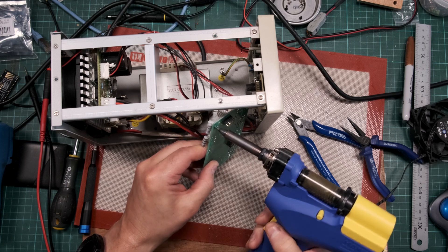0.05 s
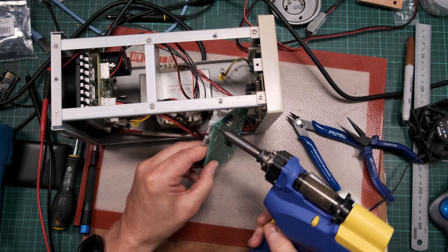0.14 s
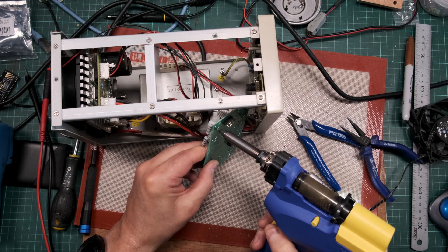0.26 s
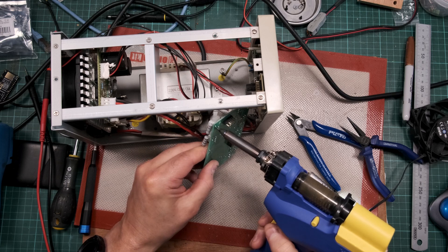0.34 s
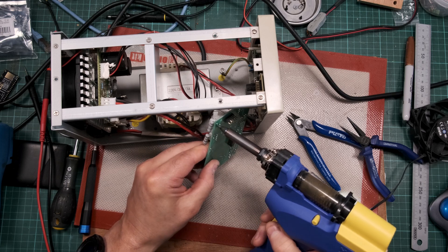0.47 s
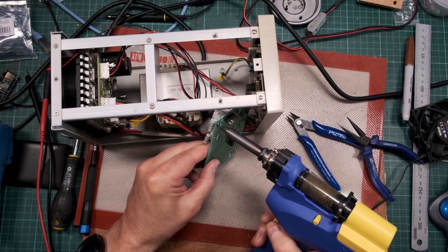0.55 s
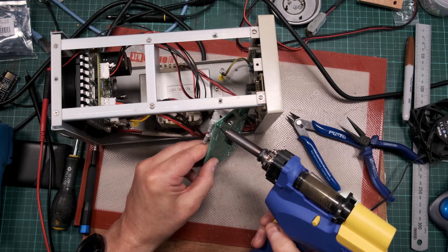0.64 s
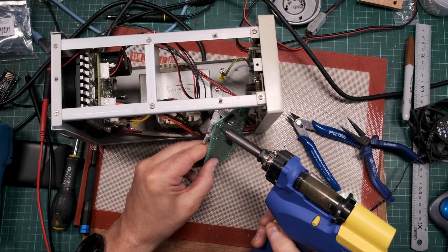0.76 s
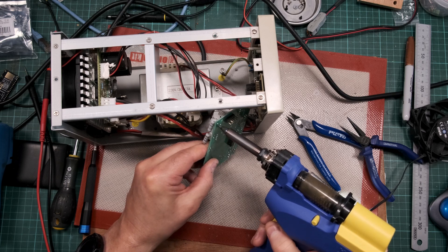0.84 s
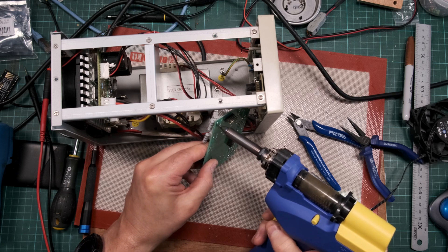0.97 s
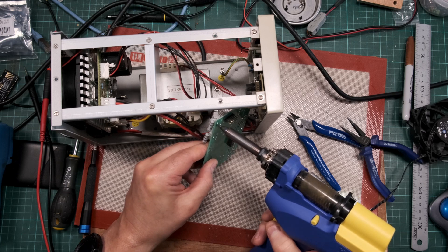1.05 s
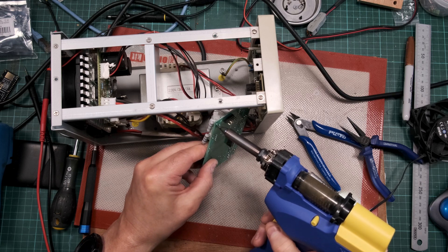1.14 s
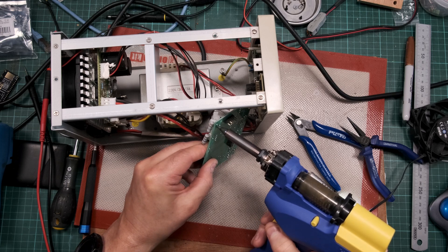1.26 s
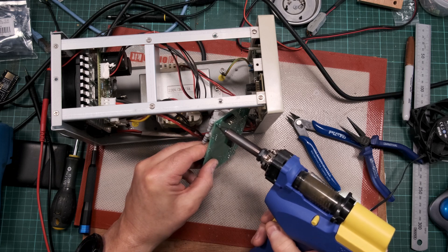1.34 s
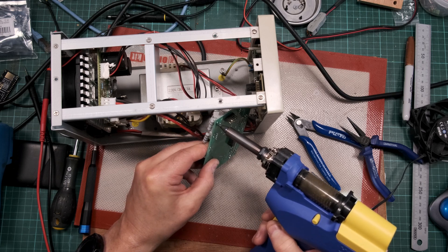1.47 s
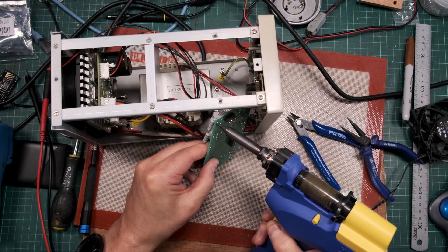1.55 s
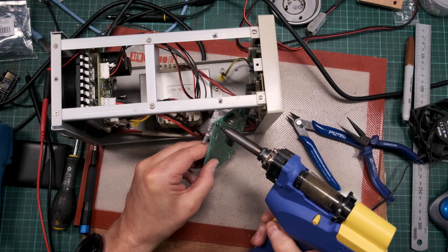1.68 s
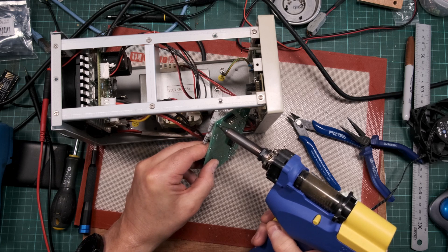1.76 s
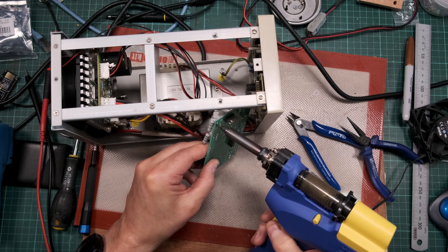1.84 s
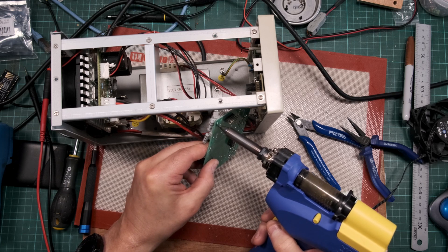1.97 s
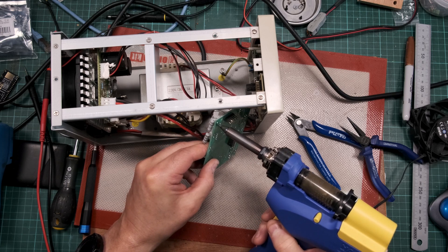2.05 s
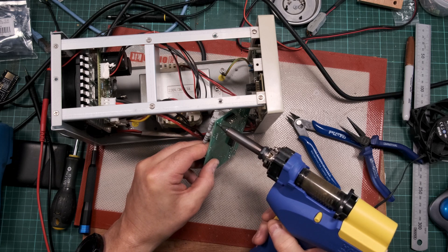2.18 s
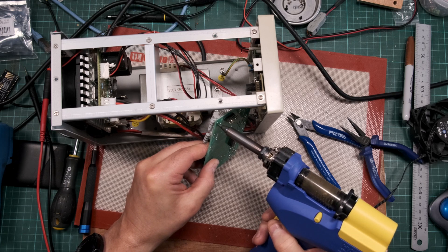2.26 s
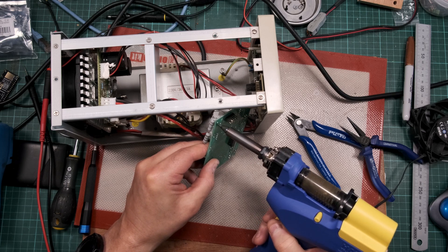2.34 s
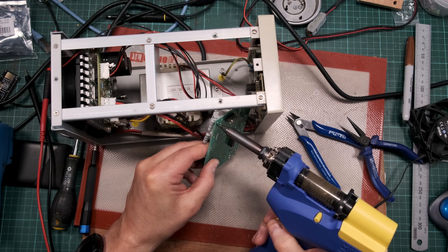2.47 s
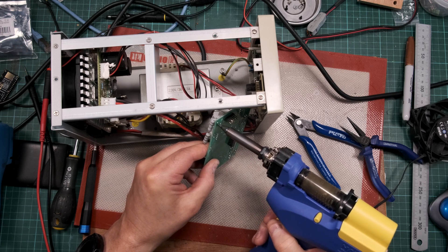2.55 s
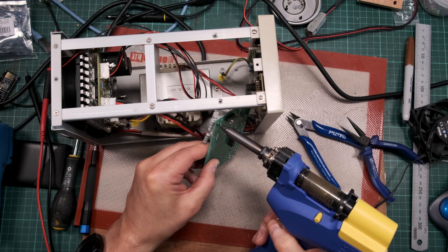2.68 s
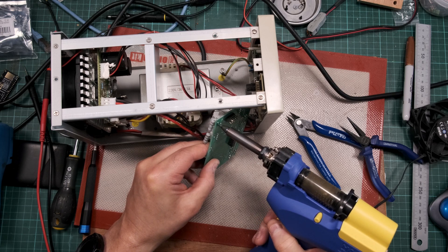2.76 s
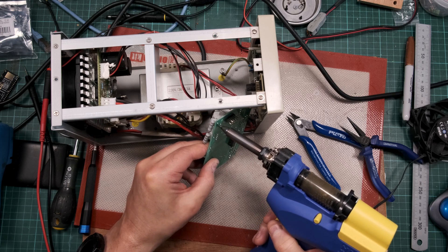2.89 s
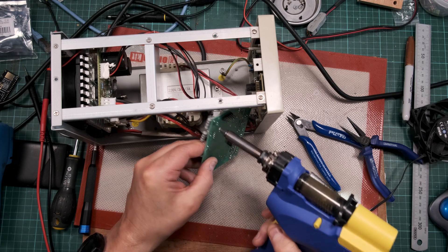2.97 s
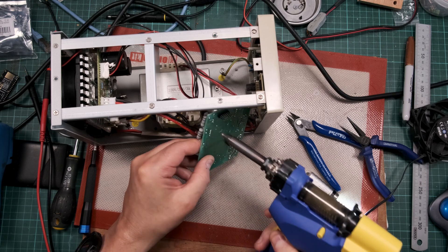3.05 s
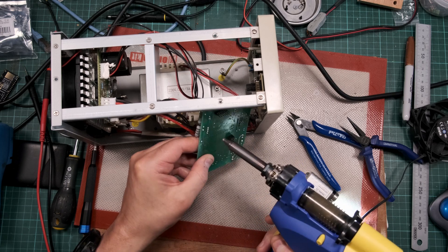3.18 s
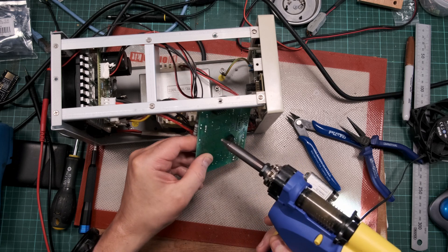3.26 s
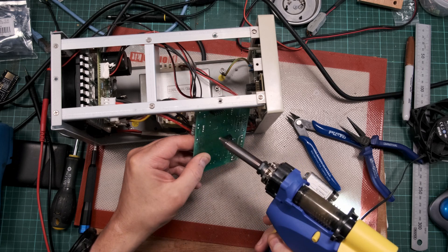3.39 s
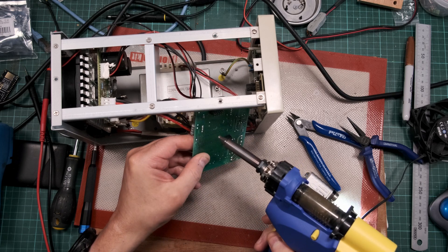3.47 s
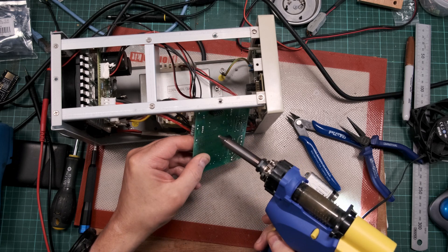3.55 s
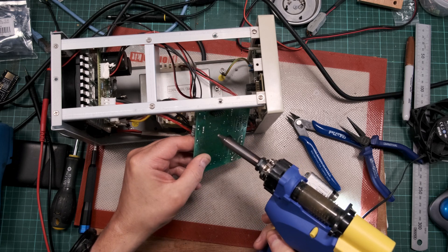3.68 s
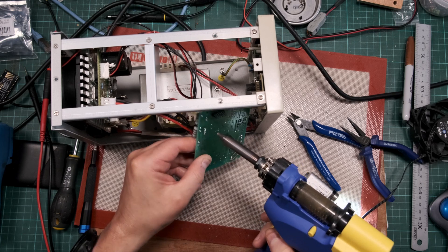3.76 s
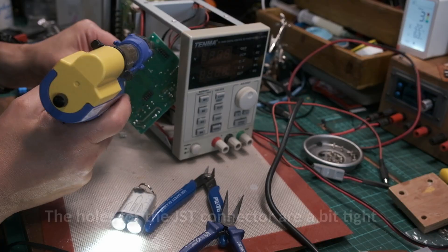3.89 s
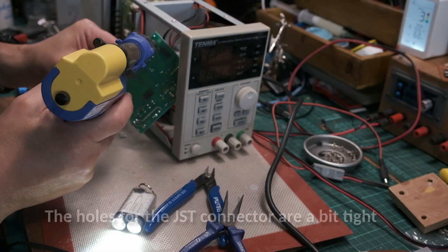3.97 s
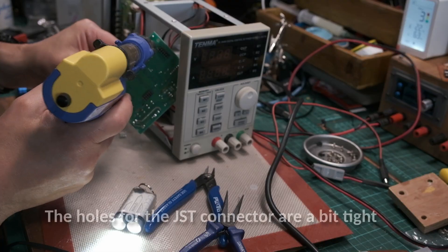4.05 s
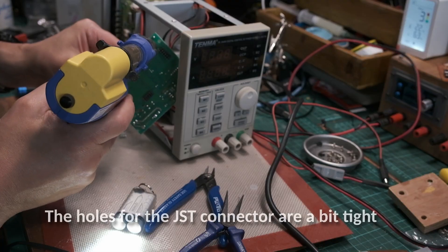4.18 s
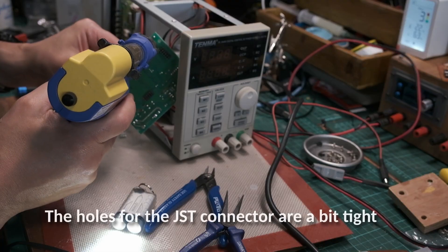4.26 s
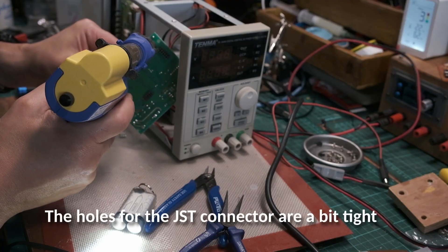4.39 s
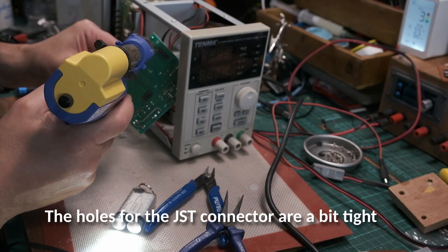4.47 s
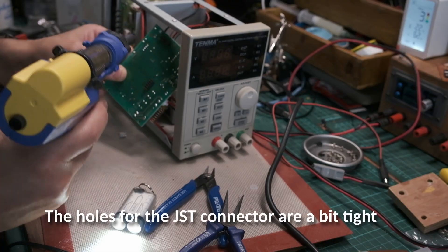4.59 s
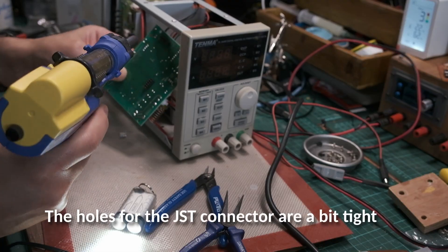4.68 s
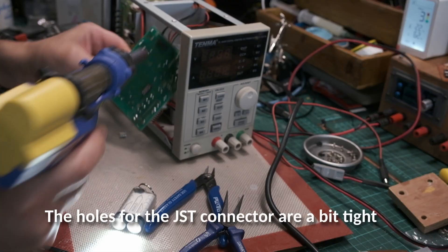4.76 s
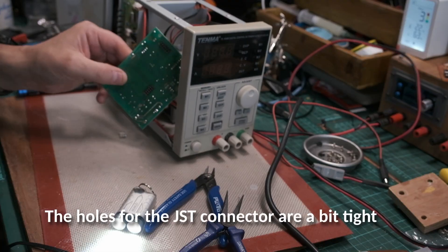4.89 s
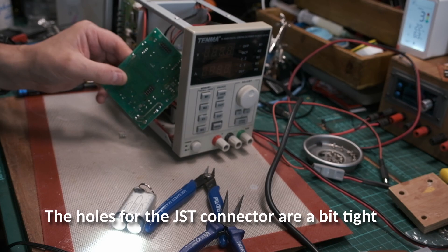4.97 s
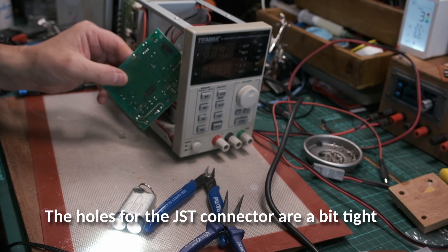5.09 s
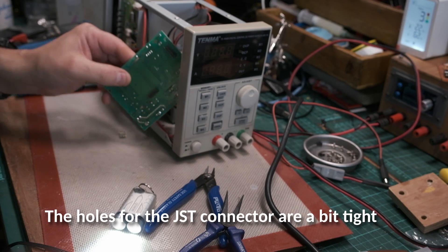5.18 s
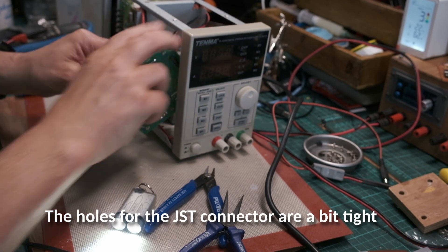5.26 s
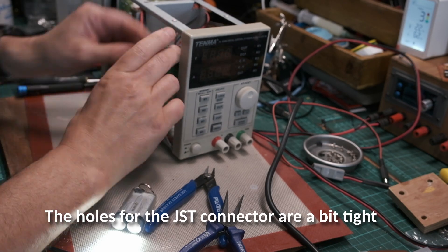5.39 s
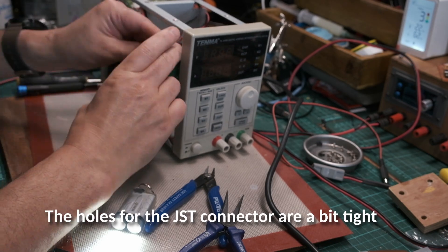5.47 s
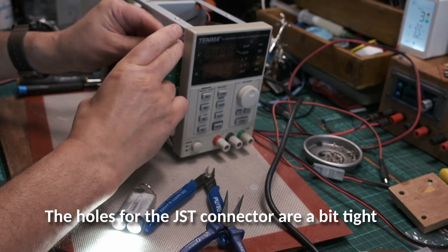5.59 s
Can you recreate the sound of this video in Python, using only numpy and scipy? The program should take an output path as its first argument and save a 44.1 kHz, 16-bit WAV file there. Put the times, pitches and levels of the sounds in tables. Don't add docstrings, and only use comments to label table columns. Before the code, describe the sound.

Over a quiet fan hum, a handheld desoldering gun buzzes twice in harsh rattling bursts, then is set down with a clack amid rustling.

```python
import sys
import numpy as np
from scipy import signal
from scipy.fft import rfft, irfft
from scipy.io import wavfile

SR = 44100
rng = np.random.default_rng(int(sys.argv[2]) if len(sys.argv) > 2 else 0)


def dump(signal):
    limited = np.clip(np.atleast_2d(signal).T, -1, 1)
    pcm = np.round(limited * 32767).astype(np.int16)
    wavfile.write(sys.argv[1], SR, pcm)


def makeup_ratio(level_db):
    decades = np.asarray(level_db, float) / 20
    return 10 ** decades


N = 248265

FULL_SPEED = 95
DROP_S, RETURN_S, BACK_S = 3.838, 3.852, 3.862
# start in seconds, release in seconds, then stroke level, rattle level
# and diaphragm level at full speed, all in dB.
PUMP_RUNS = [
    (2.336, 2.82, -27.5, -38.5, -35.5),
    (4.291, 4.53, -28, -39, -34.5),
]


def evened(x):
    return x / np.sqrt(np.mean(x ** 2) + 1e-20)


def curves(rows):
    s, *columns = np.transpose(rows)
    t = np.arange(s[0], s[-1], 1 / SR)
    return s[0], [np.interp(t, s, c) for c in columns]


def add(mix, s, sound):
    part = mix[round(s * SR):][:len(sound)]
    part += sound[:len(part)]


def coloured(count, points):
    hz = np.fft.rfftfreq(count, 1 / SR)
    f, db = np.transpose(points)
    gain = makeup_ratio(np.interp(np.log(hz + 1), np.log(f), db))
    return evened(irfft(rfft(rng.standard_normal(count)) * gain, count))


def resonate(x, hz, width):
    turn = np.exp(2j * np.pi * hz * np.arange(len(x)) / SR)
    r = np.exp(-np.pi * width / SR)
    return 2 * (turn * signal.lfilter([1 - r], [1, -r], x / turn)).real


def ring(modes, count=4000, shorter=1.):
    t = np.arange(count) / SR
    x = np.zeros(count)
    for k, (hz, db, t60) in enumerate(modes):
        x += (-1) ** k * makeup_ratio(db - 60 * t / t60 / shorter) * np.sin(2 * np.pi * hz * t)
    return x / np.linalg.norm(x)


def struck(peaks, shorter):
    hz = abs(np.fft.fftfreq(8192, 1 / SR))
    power = sum(makeup_ratio(2 * db) / (1 + (2 * shorter * (hz - f) / w) ** 2) ** 2 for f, w, db in peaks)
    gain = np.log(power + 1e-9) / 2
    return np.fft.ifft(np.exp(gain - 1j * signal.hilbert(gain).imag)).real[:4096]


def strikes(turns, size, count):
    at = np.flatnonzero(np.diff(np.floor(turns)) > 0)
    late = (np.ceil(turns[at]) - turns[at]) / (turns[at + 1] - turns[at])
    size = size[at] * makeup_ratio(0.21 * rng.standard_normal(len(at)))
    out = np.zeros(count)
    out[at], out[at + 1] = size * (1 - late), size * late
    return out


def drift(rate):
    t = np.arange(0, N, 256) / SR
    rates = np.geomspace(rate / 16, rate, num=16)
    slow = sum(np.sin(2 * np.pi * (f * t + rng.random())) / np.sqrt(f) for f in rates)
    return np.interp(np.arange(N) / SR, t, evened(slow))


def runs():
    # time in seconds, speed in turns per second.
    shaft = [(2.33, 36.51), (2.37, 72.7), (2.426, 85.37), (2.571, 93.58), (2.69, 93.81), (2.773, 96.08),
             (2.818, 92.41), (2.891, 28.31), (2.935, 33.72)]
    first_turn, stroke_lag_s = -.34, .0008
    vacuum_s = .25
    late_start, late_end, late_coast_per_s = 1.35, .92, 5.38
    (s, release, *_), (s2, release2, *_) = PUMP_RUNS
    s0, (speed,) = curves(shaft)
    part = slice(round((s - s0) * SR), None)
    turns, speed = (first_turn + np.cumsum(speed) / SR)[part], speed[part]
    t = s + np.arange(len(turns)) / SR
    late = late_end + (late_start - late_end) * np.exp(-((t - s) / vacuum_s) ** 3)
    late = late + late_coast_per_s * np.clip(t - release - .04, 0, .1)
    first = pump(turns, late, speed, *effort(0, t, speed), [1.], 0.94)

    burst = rfft(rng.standard_normal(2049) * np.exp(-(np.arange(-1024, 1025) / (0.0069 * SR)) ** 2))
    blur = irfft(burst / abs(burst), 2049)
    low, top, spin_up_s = 72, 94.8, .032
    fade_db_per_s = 1250
    t = np.arange(s2, release2 + .05, 1 / SR)
    speed = top - (top - low) * np.exp(-(t - s2) / spin_up_s)
    second = pump(np.cumsum(speed) / SR - .2, 0.9, speed, *effort(1, t, speed), blur, 0.72)
    fade = makeup_ratio(-fade_db_per_s * np.maximum(s2 + np.arange(len(second)) / SR - release2, 0))
    return [(s + stroke_lag_s, first), (s2, second * fade)]


def effort(k, t, speed):
    pace = (1, 2.5)[k]
    weak_start_db, rise_s = (-8, -14)[k], 0.017
    kick_db, stroke_kick_db, kick_s = 6, 6.5, .04
    build_db, build_s = 6, 0.084
    hum_build_db, hum_build_s, hum_db_per_decade = 8, 0.14, 61
    coast_db_per_s, rattle_coast_db_per_s = 214, 133
    start, release, stroke_db, rattle_db, low_db = PUMP_RUNS[k]
    rise = weak_start_db * np.clip(1 - (t - start) / rise_s, 0, 1)
    coast = np.maximum(t - release, 0)
    age = (t - start) * pace
    jolt = np.exp(-age / kick_s)
    stroke = stroke_db + rise + stroke_kick_db * jolt - build_db * np.exp(-age / build_s)
    stroke = stroke - coast_db_per_s * coast
    rattle = rattle_db + kick_db / pace * jolt + k * rise - rattle_coast_db_per_s * coast
    hum = low_db + hum_db_per_decade * np.log10(speed / FULL_SPEED)
    return stroke, rattle, hum - hum_build_db * np.exp(-age / hum_build_s)


def pump(turns, late, speed, stroke_db, rattle_db, low_db, blur, shorter):
    # frequency in Hz, width in Hz, level in dB.
    grip_mode, shell_modes, barrel_modes = [(249, 190, -16)], [(400, 58, -10), (461, 141, -23), (538, 112, -11),
                                                          (652, 96, -16), (775, 46, -14.5), (906, 61, -5.5),
                                                          (1033, 105, -3.5), (1181, 261, -19),
                                                          (1281, 122, -16), (1580, 300, -21)], [(1830, 111, -13), (1950, 57, -9),
                                                                         (2070, 189, -14), (2260, 73, -16),
                                                                         (2400, 166, -25), (2540, 170, -25),
                                                                         (2790, 300, -27), (3150, 148, -31),
                                                                         (3340, 49, -32), (3540, 226, -25),
                                                                         (3770, 71, -36), (4040, 262, -34),
                                                                         (4530, 300, -36), (4750, 233, -37)]
    # frequency in Hz, level in dB, t60 in seconds.
    flap_modes = [(5000, -7, .008), (5920, 1, 0.021), (6530, 9, 0.0061), (7710, 4.5, 0.0069),
                  (8100, 5.5, 0.0091), (8700, 10.5, 0.0034), (9900, -16.5, 0.011), (11100, -11.5, 0.0092),
                  (12500, -22.5, 0.007), (13920, -47, .006)]
    # share of the turn, level in dB.
    flap_blows = [(0, -5), (.09, -15.5), (0.239, -3.5), (.44, -19.5), (.66, -30.5)]
    # harmonic of the shaft, level in dB.
    harmonics = [(1, -8.5), (2, -8), (3, -4.5)]
    # frequency in Hz, density in dB per Hz.
    air_spectrum = [(2500, -14), (4000, -10.5), (5500, -6), (6350, -9), (7350, -7.5), (8460, -9),
                    (9600, -6.5), (10300, -20), (10900, -8.5), (14800, -24), (16000, -30)]
    rebound_share, full_bounce = 0.2047, 91
    shut_share, inlet_share, inlet_db = .12, .46, -8.5
    settle_s = .007

    count = len(turns) + 4000
    slow = np.sqrt(SR / speed)
    missing = FULL_SPEED - speed
    slack = np.clip(missing / 25, 0, 1)
    shell, barrel = struck(grip_mode + shell_modes, shorter), struck(barrel_modes, shorter)
    size = slow * makeup_ratio(stroke_db) / np.hypot(np.linalg.norm(shell), np.linalg.norm(barrel))

    bounce = size * np.clip(missing / full_bounce, 0, .9)
    valve = strikes(turns, size, count) + strikes(turns - rebound_share * late, bounce, count)
    blows = signal.fftconvolve(valve, shell)[:count]
    shut = strikes(turns - shut_share * late, size, count)
    blows = blows + signal.fftconvolve(shut, barrel)[:count]
    inlet = makeup_ratio(inlet_db) * strikes(turns - inlet_share, size, count)
    blows = blows + signal.fftconvolve(inlet, np.diff(barrel, 2) * 8.0)[:count]

    taps = rng.standard_normal(len(turns)) * (rng.random(len(turns)) < .01)
    shaking = taps * 10 * np.exp(.6 - turns % 1 / speed / settle_s)
    shaking = shaking * size / slow * makeup_ratio(-15.5 + 16.5 * slack)
    add(blows, 0, signal.fftconvolve(shaking, np.diff(barrel) * 3.7 + 0.67 * shell[1:]))

    flaps = np.zeros(count)
    for share, db in flap_blows:
        at = np.flatnonzero(np.diff(np.floor(turns - share * late)) > 0)
        chance = rng.standard_normal((len(at), 2))
        delay = abs((.6 + 2.5 * slack[at]) * chance[:, 0]).astype(int)
        uneven_db = (1.2 + 4 * slack[at]) * chance[:, 1]
        flaps[at + delay] += slow[at] * makeup_ratio(rattle_db[at] + db + uneven_db)
    flap_ring = ring(flap_modes, shorter=shorter)
    blows = blows + makeup_ratio(-3.5) * signal.fftconvolve(flaps, flap_ring)[:count]

    hum = -np.sqrt(2) * sum(makeup_ratio(db) * np.cos(2 * np.pi * k * (turns - .08)) for k, db in harmonics)
    puff = 0.5 + np.exp(-(turns % 1) / 0.52)
    air = makeup_ratio(rattle_db - 9.5 + 2.86 * slack) * puff * coloured(len(turns), air_spectrum)
    add(blows, 0, makeup_ratio(low_db) * hum + air)
    return signal.fftconvolve(blows, blur, "same")


def bleed(s, stop, hold_db):
    last_puff_db, last_puff_s = 4, .008
    left = stop - np.arange(s, stop + .015, 1 / SR)
    db = hold_db + last_puff_db * np.exp(-(left / last_puff_s) ** 2) + 1200 * np.minimum(left, 0)
    bands = [(2000, -14), (5000, -0.5), (6300, -1.5), (7000, -7), (7700, -1), (8600, -6), (9500, -9),
             (10300, -9), (11000, -7), (11700, -11), (12400, -4), (13300, -11), (14800, -2), (16000, -10)]
    return s, makeup_ratio(db) * coloured(len(db), bands)


def trigger(s, db, hz, t60):
    t = np.arange(1500) / SR
    spectrum = [(500, 2.0), (2000, -13.5), (8000, 0.0), (12000, -4), (16000, -17)]
    snap = coloured(1500, spectrum) * makeup_ratio(-60 * t / 0.009)
    tone = makeup_ratio(-60 * t / t60) * np.sin(2 * np.pi * hz * t) * np.minimum(t / 0.0016, 1)
    return s, makeup_ratio(db) * (.5 * snap + .6 * tone)


def landing(s, db):
    # frequency in Hz, level in dB, t60 in seconds.
    tool_modes = [(784, -16, 0.074), (2483, -3.5, 0.05), (2875, -1.5, 0.16), (3300, -10, .07),
                  (4110, -8.5, 0.074), (4700, -7, 0.04), (6240, -1, 0.014), (8000, -14, 0.039),
                  (9440, -25, 0.11)]
    scuff_s, gripped_s = .0025, .045
    t = np.arange(4000) / SR
    scuff = rng.standard_normal(600) * np.exp(-t[:600] / scuff_s)
    x = signal.fftconvolve(ring(tool_modes), scuff)[:4000] * makeup_ratio(-900 * np.maximum(t - gripped_s, 0))
    return s, makeup_ratio(db - 5) * x / abs(x).max()


def laying(s, length, peak, top_db, edge_db):
    # frequency in Hz, width in Hz, level in dB.
    bench_modes, body_modes = [(473, 114, 3.5), (609, 73, -1), (815, 250, 2), (1080, 570, 3),
                               (1450, 1040, 3)], [(2350, 430, -19), (2880, 105, 14.5), (3680, 1050, 15.5),
                                              (4900, 1500, 14.5), (6650, 890, 5), (8000, 580, -25),
                                              (10100, 1000, -5)]
    bass_db = -14.5
    u = np.arange(0, length, 1 / SR) / length
    skewed = u ** (np.log(.5) / np.log(np.clip(peak, .05, .9)))
    press_db = 38 * np.log10(np.sin(np.pi * skewed) + 1e-4)
    clumps = np.minimum(rng.exponential(1, len(u)), 3)
    grains = rng.standard_normal(len(u)) * makeup_ratio(3.0 * clumps)

    def excited(modes):
        return evened(sum(makeup_ratio(db) * evened(resonate(resonate(grains, hz, w), hz, 2 * w))
                          for hz, w, db in modes))

    soft = signal.butter(2, min(2700 / peak, 16000), fs=SR, output="sos")
    tool = signal.sosfilt(soft, excited(body_modes))
    bass = evened(resonate(resonate(grains, 280, 130), 304, 190))
    body = makeup_ratio(top_db + press_db) * excited(bench_modes)
    return s, body + makeup_ratio(edge_db + press_db) * tool + makeup_ratio(top_db + bass_db + press_db) * bass


def tick(s, db, hz, top_db):
    # frequency in Hz, t60 in seconds.
    board_modes = [(2110, 0.036), (2740, 0.051), (3600, 0.028), (4500, 0.0085), (5700, 0.0063),
                   (7200, 0.0068)]
    modes = [(f * rng.uniform(0.91, 1.03), -5.0 * abs(np.log2(f / hz)), t60) for f, t60 in board_modes]
    body = np.convolve(ring(modes + [(hz, 0, .015)], count=1500), [1, 0, -1])
    snap = np.diff(rng.standard_normal(len(body) + 2), 2)
    snap = snap * makeup_ratio(-60 * np.arange(len(body)) / SR / 0.027)
    return s, makeup_ratio(db) * (body / abs(body).max() + 0.33 * makeup_ratio(top_db) * snap)


def thud(s, db, hz):
    t = np.arange(3000) / SR
    return s, makeup_ratio(db - 60 * t / 0.052) * np.sin(2 * np.pi * hz * t) * np.minimum(t / 0.00475, 1)


def rustle(peak, rise, fall, mid_db, top_db):
    s = max(peak - rise, 0)
    t = np.arange(s - peak, 1.5 * fall, 1 / SR)
    stroke_db = -20 * np.maximum(-t / rise, t / fall)
    mid = coloured(len(t), [(500, -4.0), (2000, -0.5), (5000, 1.0), (9000, -16.5), (16000, -44)])
    top = coloured(len(t), [(5000, -18), (8000, -10), (13000, -14), (16000, -15)])
    return s, makeup_ratio(mid_db + stroke_db) * mid + makeup_ratio(top_db + stroke_db) * top


def echo(x, t60):
    t = np.arange(12000) / SR
    tail = coloured(12000, [(100, -3), (1000, 0), (4000, -8), (16000, -22)])
    tail = tail * makeup_ratio(-60 * t / t60) * (t > .004)
    return makeup_ratio(-17) * signal.fftconvolve(x, tail / np.linalg.norm(tail))[:N]


def room():
    # frequency in Hz, level in dB.
    air_colour = [(25, -46), (40, -27), (64, -18.5), (236, -5), (373, -8.5), (476, -8.5), (545, -9),
                  (796, -7), (887, -3.5), (1230, -14.5), (2410, -20.5), (4610, -22.5), (8360, -29),
                  (14800, -30.5), (16000, -48)]
    # time in seconds, level in dB.
    air_level = [(0, -61.5), (.4, -62.5), (3.8, -61.5), (3.9, -64), (5.63, -64)]
    # frequency in Hz, width in Hz, level in dB.
    fan_tones = [(242.2, 16, -79), (461, 8, -78.5), (599, 5.5, -81), (891, 3, -73.5), (972, 61, -74.5),
                 (14643, 3, -94)]
    level_db = curves(air_level)[1][0]
    air = makeup_ratio(-3.5) * coloured(N, air_colour)
    white = rng.standard_normal(N)
    tones = np.zeros(N)
    for hz, w, db in fan_tones:
        tone = whine(hz, w) if w < 10 else resonate(white, hz, w)
        tones += makeup_ratio(db + 62) * evened(tone)
    return (air + tones) * makeup_ratio(np.pad(level_db, (0, N), "edge")[:N])


def whine(hz, width):
    wander = np.sqrt(2 * np.pi * width / SR) * rng.standard_normal(N)
    return np.sin(np.cumsum(2 * np.pi * hz / SR + wander))


def outside():
    # time in seconds, speed in turns per second, level in dB.
    engine = [(0, 55, -75), (.6, 55.5, -80), (1.0, 58, -71), (1.3, 56, -80), (1.55, 59.5, -72),
              (1.8, 59, -75), (1.98, 59.6, -72), (2.15, 59, -71), (2.33, 55.5, -81)]
    # order of the turn, level in dB.
    orders = [(2, -3.5), (3, 0)]
    out = rumble()
    s, (speed, db) = curves(engine)
    for k, order_db in orders:
        waver_db = 2 * drift(rate=8)[:len(db)]
        tone = np.sin(2 * np.pi * k * np.cumsum(speed) / SR)
        add(out, s, np.sqrt(2) * makeup_ratio(db + order_db + waver_db) * tone)
    return out


def rumble():
    level_db = np.where(np.arange(N) / SR < RETURN_S, -81, -93) + 5 * drift(rate=5.9)
    spectrum = [(20, -31), (60, -19), (110, -3.0), (170, 2.5), (240, -7.0), (400, -40)]
    return makeup_ratio(level_db) * coloured(N, spectrum)


def scene():
    # start in seconds, stop in seconds, level in dB.
    bleeds = [
        (2.932, 3.078, -65),
        (4.551, 4.581, -66.5),
    ]
    # time in seconds, peak in dB, ring in
    # Hz, t60 in seconds.
    clicks = [
        (2.319, -25, 6000, .027),
        (2.326, -28.5, 2000, 0.016),
        (2.3443, -13, 8000, .006),
        (2.819, -21.5, 9000, .006),
        (4.2946, -22.5, 8410, 0.017),
        (4.3086, -22, 1020, 0.053),
    ]
    # time in seconds, peak in
    # dB, brightest mode in Hz, level above 6 kHz in dB.
    taps = [(0.0074, -43, 1930, -8), (0.0212, -45.5, 5300, -10), (0.0456, -51.5, 1840, -20),
            (0.0965, -44.5, 2200, -23.5), (0.2104, -62.5, 4690, -16), (0.2895, -58.5, 2660, -16),
            (0.8245, -47, 3630, -20), (0.9722, -54, 2510, -23), (1.1532, -54.5, 5920, -9),
            (1.3211, -51, 4100, -9), (1.381, -48.5, 2196, -16), (1.483, -63, 2720, 5),
            (1.7194, -70.5, 2000, -8), (2.274, -53, 4500, -17), (3.073, -45.5, 3700, -21),
            (3.188, -57, 4730, -21), (3.437, -51, 4040, -11), (3.9279, -59.5, 2610, -25),
            (4.0594, -64, 2110, -14), (4.6843, -60.5, 2520, -17), (4.9054, -52, 2700, -23),
            (5.332, -50, 4900, -15), (5.3864, -39.5, 3630, -28), (5.5026, -53, 3680, -14),
            (5.519, -51.5, 3750, -20)]
    # start in seconds, length in seconds, share before the peak,
    # body level in dB, edge level in dB.
    contacts = [
        (5.022, .04, 0.46, -31.5, -37),
        (5.052, 0.03, 0.59, -47.5, -52),
        (5.0765, .024, 0.18, -33.5, -31),
        (5.088, 0.027, 0.43, -35, -43),
        (5.109, .03, 0.18, -56, -55),
    ]
    # time in seconds, peak in dB.
    landings = [
        (5.077, -18),
    ]
    # peak in seconds, rise and fall over 20 dB in seconds,
    # level in dB, level of the top above 8 kHz in dB.
    rubs = [(.01, 0.025, 0.17, -67.5, -79), (4.812, 0.074, 0.2, -68, -77), (4.996, 0.033, 0.014, -59, -69),
            (5.278, 0.079, 0.097, -59, -65.5), (5.335, 0.021, .02, -62, -78), (5.38, .04, 0.02, -59, -62),
            (5.446, .02, 0.043, -65, -80), (5.51, .012, 0.047, -65.5, -74), (5.584, 0.046, .05, -71, -90)]
    # time in seconds, peak in dB, frequency in Hz.
    knuckles = [(4.168, -59, 88.8), (4.633, -54, 304), (5.182, -51.5, 330), (5.265, -54.5, 151)]
    sounds = runs()
    for source, rows in [(bleed, bleeds), (trigger, clicks), (tick, taps), (laying, contacts),
                         (landing, landings), (rustle, rubs), (thud, knuckles)]:
        sounds += [source(*row) for row in rows]
    bench = np.zeros(N)
    for s, sound in sounds:
        add(bench, s, sound)
    bench = signal.sosfilt(signal.butter(2, 120, "high", fs=SR, output="sos"), bench)
    early = np.arange(N) < RETURN_S * SR
    wet = echo(bench * early, 0.21) + echo(bench * ~early, 0.055)
    return (bench + wet + room() + outside())[None]


def low_pass(x):
    return signal.sosfilt(signal.butter(12, 16480, fs=SR, output="sos"), x)


def record(dry):
    t = np.arange(N) / SR
    fade_out = np.clip((DROP_S + 0.00081 - t) / 0.0048, .01, 1)
    fade_in = np.clip((t - RETURN_S) / (BACK_S - RETURN_S), 0, 1)
    gate = np.maximum(fade_out, fade_in)
    edge = signal.firwin(301, 15750, window=("kaiser", 8), fs=SR)
    return low_pass(signal.oaconvolve(dry * gate, edge[None], "same"))


dry = scene()
out = record(dry)
dump(out)
```